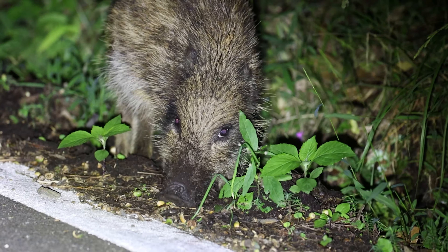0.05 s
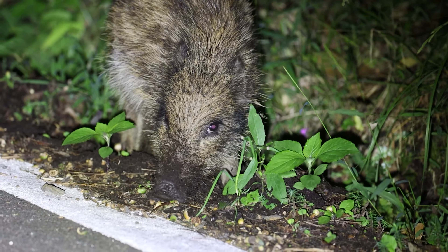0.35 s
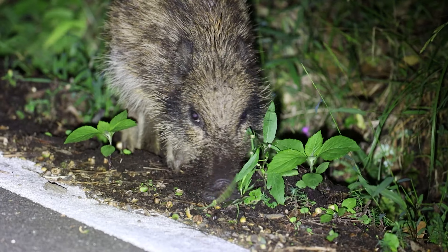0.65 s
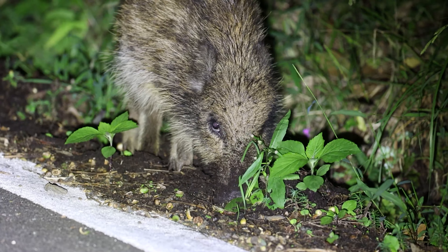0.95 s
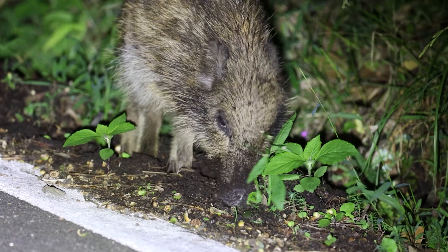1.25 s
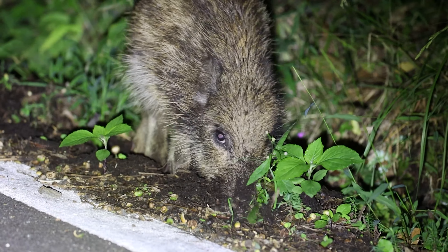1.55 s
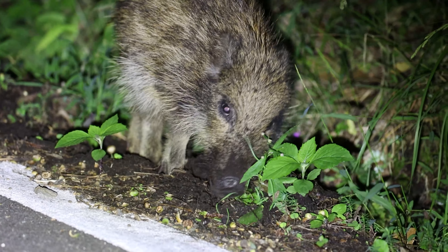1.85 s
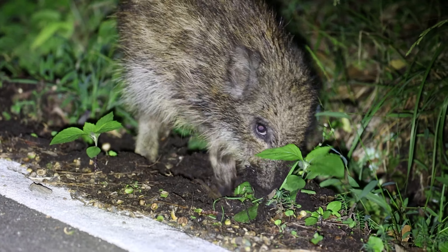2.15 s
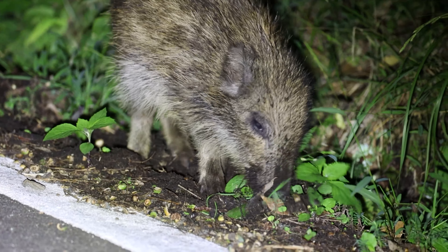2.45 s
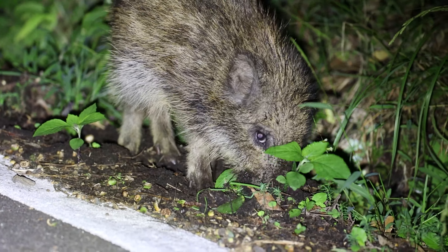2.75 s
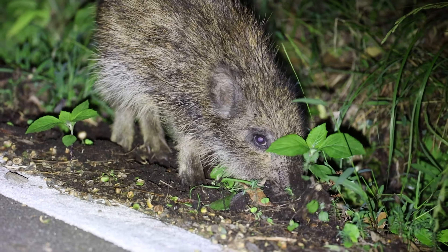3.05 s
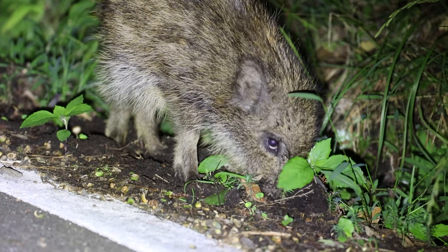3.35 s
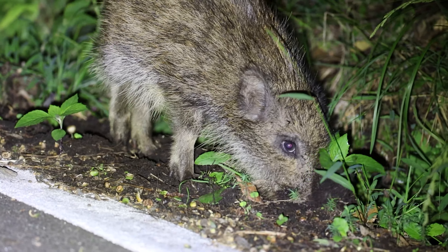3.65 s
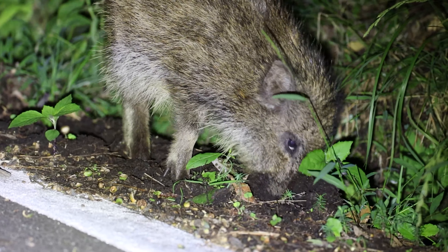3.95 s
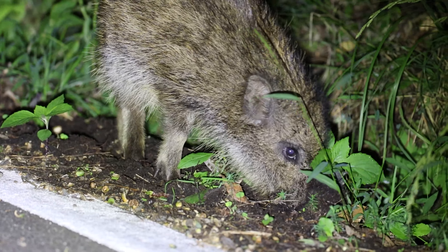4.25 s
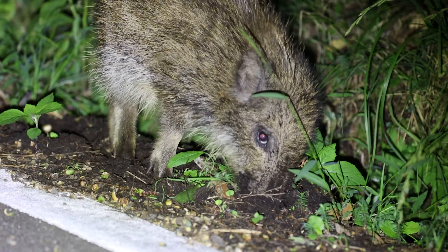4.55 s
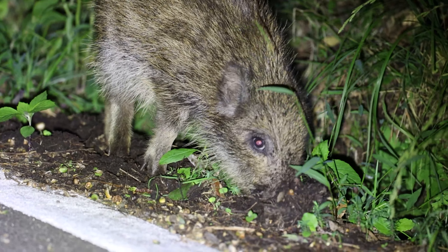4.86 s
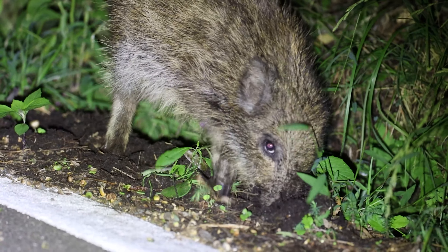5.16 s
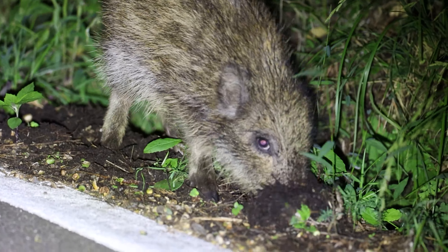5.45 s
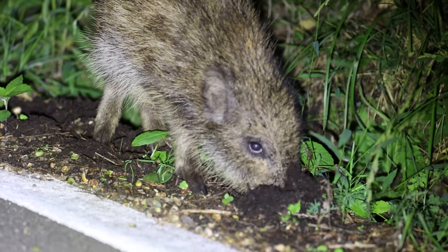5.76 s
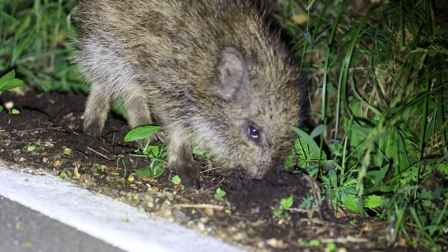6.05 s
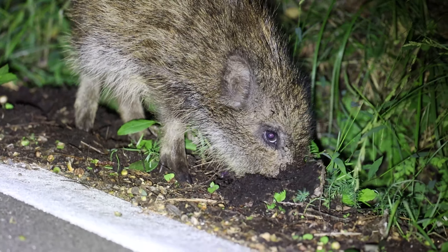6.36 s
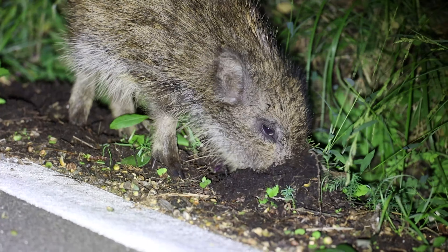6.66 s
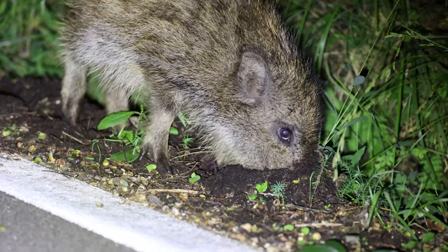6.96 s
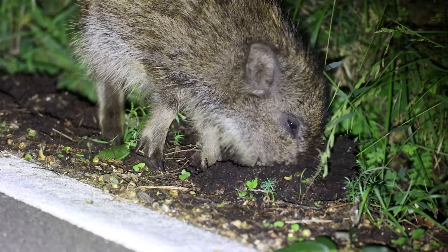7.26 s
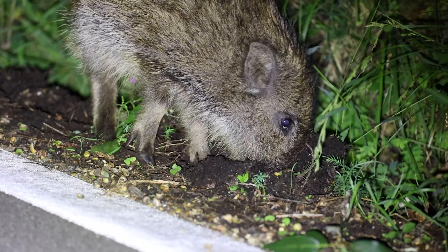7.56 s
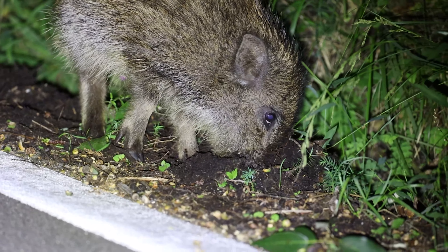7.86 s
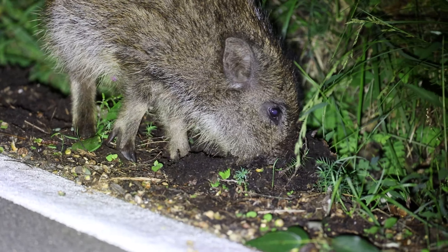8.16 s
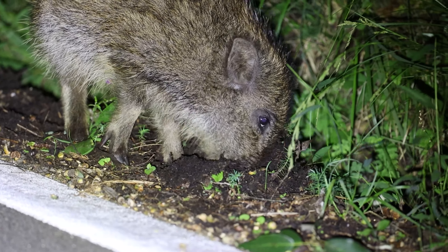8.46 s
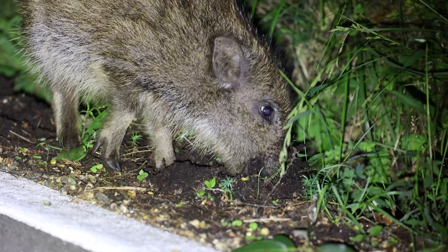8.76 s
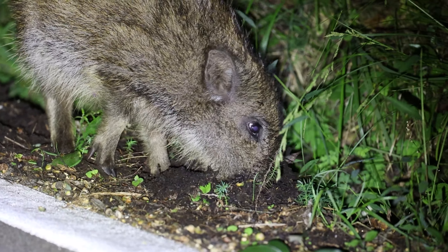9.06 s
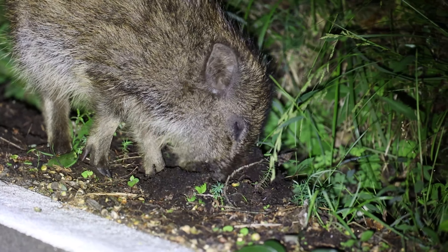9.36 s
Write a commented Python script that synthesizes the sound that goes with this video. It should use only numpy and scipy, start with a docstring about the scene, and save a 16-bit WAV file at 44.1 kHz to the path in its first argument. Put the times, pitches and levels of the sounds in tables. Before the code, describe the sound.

Crickets chirp over a quiet night rush while a young boar roots in soil with faint snaps and rustles, and one sharp pop.

```python
"""Crickets chirp in short trains of falling pulses over the far, steady rush of a forest roadside at night.
Each pulse is one wing stroke, a scraper dragged over a file. A young boar roots in the soil:
stems snap, leaves brush, loose earth scuffs. A low rumble swells twice in the distance,
and one sharp pop hits the right microphone."""
import sys
import numpy as np
from scipy import signal
from scipy.fft import rfft, irfft, next_fast_len
from scipy.io import wavfile
from scipy.ndimage import map_coordinates

SR = 44100
rng = np.random.default_rng(int(sys.argv[2]) if len(sys.argv) > 2 else 0)


def unload_wav(signal):
    """Save mono or channel-first audio to the path in sys.argv[1] as 16-bit WAV at rate SR, clipped to [-1, 1]."""
    wavfile.write(
        sys.argv[1],
        SR,
        np.round(np.clip(np.atleast_2d(signal).T, -1, 1) * 32767).astype(np.int16),
    )


N = 414981
TIME = np.arange(N) / SR


def crickets():
    """Four singers to the left, each with its own pitch and tempo, and a blur of far ones."""
    # bouts of the near cricket: t/s, chirps, chirp period/s, level/dB, first-pulse offset/dB
    near_bouts = [(.162, 3, .2955, -41, 0), (3.625, 4, .297, -41, -2), (7.237, 4, .3035, -41.5, -1.5)]
    # bouts of the low, the high and the scratchy cricket: t/s, chirps, chirp period/s, level/dB
    low_bouts = [(.838, 8, .379, -48), (5.565, 10, .3838, -48)]
    high_bouts = [(.015, 4, 0.27, -54), (1.12, 4, .316, -56.5), (4.679, 5, .308, -53),
                  (8.62, 3, 0.29, -51.5)]
    scratchy_bouts = [(3.432, 4, .298, -51.5), (3.888, 4, .299, -49.5), (7.976, 4, .299, -50)]
    lead_s, opener_db = .236, -43.5     # a two-pulse chirp leads into the later near bouts
    openers = [(s - lead_s, 2, opener_db) for s, *_ in near_bouts if s > lead_s]
    near = cricket(openers + chirp_rows(near_bouts, pulses=4), hz=4040, fall_hz=760, rise_hz=70,
                   half_s=.0095, period_s=.0264, swell_db=1.5, left_db=4, wet_db=-9, band_width_hz=2000)
    low = cricket(chirp_rows(low_bouts, pulses=6), hz=3660, fall_hz=680, rise_hz=-40,
                  half_s=.008, period_s=.0213, swell_db=1, left_db=4, wet_db=-14, band_width_hz=1800)
    high = cricket(chirp_rows(high_bouts, pulses=4), hz=4270, fall_hz=340, rise_hz=18,
                   half_s=.008, period_s=.027, swell_db=.5, left_db=5, wet_db=-3)
    scratchy = cricket(chirp_rows(scratchy_bouts, pulses=4), hz=4170, fall_hz=1050, rise_hz=0,
                       half_s=.01, period_s=.027, swell_db=-.5, left_db=5, wet_db=-7, band_width_hz=2200)
    far_chirps = [(s, 4, -66.5) for s in rng.uniform(0, N / SR, size=110)]
    far = cricket(far_chirps, hz=4194, fall_hz=600, rise_hz=30,
                  half_s=.008, period_s=.02, swell_db=6, left_db=6, wet_db=3)
    return near + low + high + scratchy + far


def cricket(chirps, hz, fall_hz, rise_hz, half_s, period_s, swell_db, left_db, wet_db,
            band_width_hz=1200):
    """Each wing closure drags the scraper over the file: a short tone that falls as the wing slows."""
    out = np.zeros(N)
    u = np.arange(-1, 1, 1 / (half_s * SR))     # -1 to 1 through one stroke
    pressure = np.cos(np.pi * u / 2) ** 2
    for s, pulses, level_db, *first_db in chirps:
        for k, (loud, sharp, grip) in enumerate(rng.standard_normal((8, 3))[:pulses]):
            progress = k / max(pulses - 1, 1) - .5     # -0.5 to 0.5 through the chirp
            pitch = hz + rise_hz * progress + 40 * sharp - fall_hz * u * (1 + .14 * grip)
            stroke_db = level_db + swell_db * progress + loud + (sum(first_db) if k == 0 else 0)
            stroke = pressure * np.sin(2 * np.pi * np.cumsum(pitch) / SR)
            add(out, s + k * period_s - half_s, from_db(stroke_db) * stroke)
    out *= 1 + .25 * drift(rate=800)     # uneven file teeth
    # a narrow band near 4 kHz stands out, loudest early in each pulse
    out = resonate(out, hz + 100, band_width_hz)
    scattered = thicket(out, t60=.04) + .7 * thicket(out, t60=.25)     # close grass, then farther leaves
    return two_ports(out, left_db) + from_db(wet_db) * scattered


def chirp_rows(bouts, pulses, spread_db=1.3):
    """Bouts as single, slightly uneven chirps: t/s, pulses, level/dB, first-pulse offset/dB if any."""
    return [(s + k * period_s, pulses, level_db + spread_db * chance, *first_db)
            for s, chirps, period_s, level_db, *first_db in bouts
            for k, chance in enumerate(rng.standard_normal(12)[:chirps])]


def snaps(crack_db=-3, wet_db=-5, left_db=-4):
    """A stem breaks under the snout with a dry crack and a brief woody ring."""
    # breaking stems: t/s, level/dB, ring f/Hz, t60/s
    stems = [(.223, -40, 2100, .008), (.2447, -35.5, 1800, .008), (.691, -38, 1980, .014),
             (.706, -36, 1490, .025), (1.2063, -36.5, 1420, .013), (1.8598, -38.5, 1500, 0.0094),
             (4.975, -39.5, 2100, .007), (5.8088, -39.5, 1600, .008), (7.1981, -39.5, 1700, .006),
             (8.2138, -38.5, 1550, .012), (8.2423, -35, 1340, 0.0098), (8.5354, -31, 1970, 0.0037),
             (8.555, -33.5, 2660, 0.0078), (8.575, -36, 2600, .01), (8.626, -26.5, 1590, 0.0057),
             (8.6492, -33.5, 2570, 0.013)]
    out, t = np.zeros(N), TIME[:SR // 20]
    for s, level_db, hz, t60 in stems:
        decay = from_db(-60 * t / t60)
        crack = resonate(rng.standard_normal(len(t)) * decay, 3100, 2500)
        snap = np.sin(2 * np.pi * hz * t) * decay + from_db(crack_db) * crack
        snap = cut(cut(snap, 4800, "low", order=4), 150, "high")
        add(out, s, from_db(level_db) * snap / np.abs(snap).max())
    return out * pan(left_db) + from_db(wet_db) * thicket(out, t60=.091)


def rustles(attack_s=.0003, grain_db=2):
    """Clumps of tiny fractures: a crunch from the soil and a thin hiss from the leaves."""
    # roots tearing and leaves brushing: t/s, decay/s, crunch level/dB, hiss level/dB, hiss f/Hz
    clumps = [(.222, .006, -46, -59, 4500), (0.688, 0.01, -44, -53.5, 5000),
              (0.703, 0.0045, -48, -56, 5500), (1.13, .04, -50.5, -63, 11000),
              (2.475, 0.051, -52, -64, 7000), (4.974, .005, -58, -54.5, 9000),
              (5.188, .02, -52, -57, 12500), (5.245, .015, -70, -57, 14000), (5.47, .05, -54, -61.5, 8000),
              (7.525, 0.057, -54, -61, 6000), (8.534, 0.096, -44.5, -62, 10000),
              (8.625, 0.12, -54, -68, 9000)]
    # spectrum of tearing roots and soil: f/Hz, level/dB
    soil_spectrum = [(40, -40), (200, -12), (600, 1), (1200, 3), (1700, 4.5), (2050, 5), (2600, 5.5),
                     (3200, -1.5), (4200, 1.5), (5500, -2), (7500, -17.5), (15000, -23)]
    out, t = np.zeros((2, N)), TIME[:SR // 3]
    grains = rms_one(from_db(grain_db * drift(rate=470)))
    soil = diffuse(soil_spectrum)
    for s, decay_s, crunch_db, hiss_db, hz in clumps:
        leaves = rms_one(resonate(rng.standard_normal((2, len(t))), hz, 5000))
        crunch = np.roll(soil, -round(s * SR), axis=1)[:, :len(t)]
        envelope = (1 - np.exp(-t / attack_s)) * np.exp(-t / decay_s)
        add(out, s, envelope * (from_db(crunch_db) * crunch + from_db(hiss_db) * leaves))
    return out * grains


def shoves():
    """Loose earth gives way under the snout with a dull scuff."""
    # pushes of the snout: centre t/s, length/s, level/dB
    pushes = [(0.62, 0.021, -52), (1.248, 0.79, -61), (3.327, 0.6, -58.5), (3.7, .25, -60.5)]
    earth = resonate(rng.standard_normal(N), hz=400, width_hz=430)
    envelope = np.zeros(N)
    for s, length_s, level_db in pushes:
        add(envelope, s - length_s / 2, from_db(level_db) * np.hanning(round(length_s * SR)))
    return envelope * rms_one(cut(earth, 900, "low"))


def pop(s, step_db, leak_s, bass_hz):
    """A knock on the right port: a pressure step leaks away and swings back through the mic's bass cut."""
    out, t = np.zeros((2, N)), TIME[:SR // 10]
    step = cut(np.exp(-t / leak_s), bass_hz, "high")
    step = cut(step, 6610, "low", order=4)
    through_case = from_db(-7) * cut(step, 35, "low", order=1)     # only a dull thud reaches the left
    add(out, s, from_db(step_db) * np.array([through_case, step]))
    return out


def rumble():
    """Far, low noise swells twice; each time it sags slowly, then dies away."""
    # surges of the rumble: crest t/s, hold/s, level/dB
    crests = [(5.713, .62, -50), (7.65, 0.41, -53.5)]
    # spectrum of the rumble: f/Hz, level/dB
    spectrum = [(60, -25), (120, -14.5), (185, 5.5), (250, 1.5), (330, -3.5), (450, -3.5), (700, -18),
                (1500, -48)]
    envelope = sum(surge(s, level_db, rise=42, fall=41, hold_s=hold_s, sag=8.5)
                   for s, hold_s, level_db in crests)
    return envelope * diffuse(spectrum) * from_db(1.4 * drift(rate=20))


def drone():
    """A faint, deep hum grows and breaks off as the first rumble crests."""
    hum = resonate(resonate(rng.standard_normal(N), 79, 7.1), 73.7, 11)
    return surge(crest_s=5.7, level_db=-66, rise=18, fall=45) * rms_one(hum)


def swells(half_s=.06):
    """Brief, gliding low tones rise out of the rush and sink again."""
    # low tones: centre t/s, level/dB, f/Hz
    tones = [(2.59, -55.5, 250), (5.41, -50.5, 283), (6.39, -55, 276.4), (6.54, -53, 251), (6.82, -54, 208),
             (7.859, -51.5, 200.4), (8.79, -54.5, 250.5)]
    out, u = np.zeros(N), np.arange(-1, 1, 1 / (half_s * SR))
    envelope = np.cos(np.pi * u / 2) ** 2
    for s, level_db, hz in tones:
        pitch = hz * (1 + .043 * rng.standard_normal() * u)
        add(out, s - half_s, from_db(level_db) * envelope * np.sin(2 * np.pi * np.cumsum(pitch) / SR))
    return out


def night_rush():
    """A steady bed of far noise with a low tone wavering in it."""
    # spectrum of the night air: f/Hz, level/dB
    spectrum = [(15, -54), (25, -27), (68, -10), (101, -12), (173, -7.5), (260, -3.5), (359, -6.5),
                (631, -5), (722, -8.5), (804, -6.5), (1900, -6), (3170, -12), (4150, -10), (6730, -24.5),
                (15500, -28.5)]
    air = from_db(-51) * diffuse(spectrum)
    waver = from_db(-69 + 3.3 * drift(rate=9))
    tone = resonate(resonate(rng.standard_normal(N), 282, 40), 268, 47)
    return air + waver * rms_one(tone)


def distance():
    """The far layers together, reaching the left port just ahead of the right."""
    left, right = (night_rush() + rumble() + drone() + swells()) * pan(-.76)
    return np.array([left, np.roll(right, shift=6)])


def thicket(x, t60):
    """Leaves, trunks and the bank scatter a short tail, different on each side."""
    t = TIME[:SR // 2]
    tail = rng.standard_normal((2, len(t))) * from_db(-60 * t / t60) * (t > .002)
    tail /= np.sqrt(np.sum(tail ** 2) / 2)
    return signal.fftconvolve(x[None], tail, axes=1)[:, :N]


def two_ports(x, left_db):
    """A source on the left: the right port hears it later, together with a reflection off the road."""
    right = .9 * later(x, .00016) + .25 * later(x, .0023)
    return np.array([x, right]) * pan(left_db)


def diffuse(spectrum):
    """Noise from all around: alike at both microphones in the low mids, nearly unrelated in the treble."""
    # likeness of left and right: f/Hz, correlation
    likeness = [(60, 0.15), (130, 0.78), (290, 0.8), (640, 0.66), (1410, 0.66), (3100, -0.04), (7000, 0.2),
                (15000, -0.23)]
    size = next_fast_len(N)
    hz = np.arange(size // 2 + 1) * SR / size
    mid, side = rfft(rng.standard_normal((2, size))) * from_db(at_hz(spectrum, hz))
    alike = at_hz(likeness, hz)
    stereo = np.sqrt(1 + alike) * mid + np.sqrt(1 - alike) * side * [[1], [-1]]
    return rms_one(irfft(stereo, size)[:, :N])


def surge(crest_s, level_db, rise, fall, hold_s=0, sag=0):
    """Gain that climbs to a crest, sags while it holds and falls away; slopes in dB/s."""
    t = TIME - crest_s
    shape_db = rise * np.minimum(t, 0) - sag * np.clip(t, 0, hold_s) - fall * np.maximum(t - hold_s, 0)
    return from_db(level_db + shape_db)


def drift(rate):
    """Random wandering at unit rms, through `rate` knots a second."""
    knots = rng.standard_normal(4000)
    curve = map_coordinates(knots, [TIME[::50] * rate], order=2, mode="wrap")
    return rms_one(curve).repeat(50)[:N]


def resonate(x, hz, width_hz):
    """Two-pole resonance with unity gain at its peak."""
    r = np.exp(-np.pi * width_hz / SR)
    feedback = [1, -2 * r * np.cos(2 * np.pi * hz / SR), r * r]
    return signal.lfilter(np.array([1, 0, -1]) * (1 - r * r) / 2, feedback, x)


def cut(x, hz, kind, order=2):
    """Butterworth low- or high-pass."""
    return signal.sosfilt(signal.butter(order, hz, kind, fs=SR, output="sos"), x)


def pan(left_db):
    """Channel gains that put the left side left_db above the right."""
    return from_db([[left_db / 2], [-left_db / 2]])


def later(x, s):
    """The same sound s seconds later."""
    return np.interp(TIME - s, TIME, x, left=0)


def add(track, s, sound):
    """Mix a sound into a track from time s on."""
    start = max(round(s * SR), 0)
    part = sound[..., :max(N - start, 0)]
    track[..., start:start + part.shape[-1]] += part


def at_hz(points, hz):
    """Read a table on a log-frequency axis."""
    freqs, values = np.transpose(points)
    return np.interp(np.log(hz + .0013), np.log(freqs), values)


def from_db(db):
    """Decibels to gain."""
    return 10 ** (np.asarray(db) / 20)


def rms_one(x):
    """Scale to unit rms."""
    return x / np.sqrt(np.mean(x ** 2) + 1e-20)


def scene():
    """Crickets, the rooting boar, the pop and the far background."""
    boar = snaps() + shoves() + rustles()
    knock = pop(s=3.85495, step_db=3.6, leak_s=.0011, bass_hz=93)
    return crickets() + boar + knock + distance()


def record(dry):
    """Clip at full scale, then cut the top steeply at 15.8 kHz."""
    top_cut = signal.ellip(10, .1, 70, 15800, fs=SR, output="sos")
    return signal.sosfilt(top_cut, np.clip(dry, -1, 1))


dry = scene()
out = record(dry)
unload_wav(out)
```